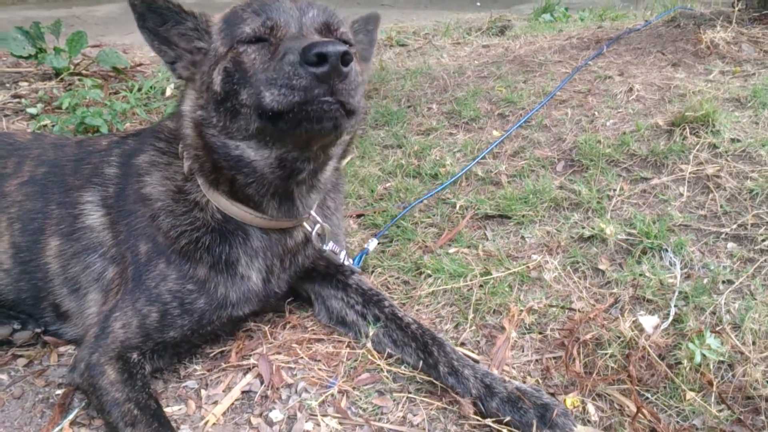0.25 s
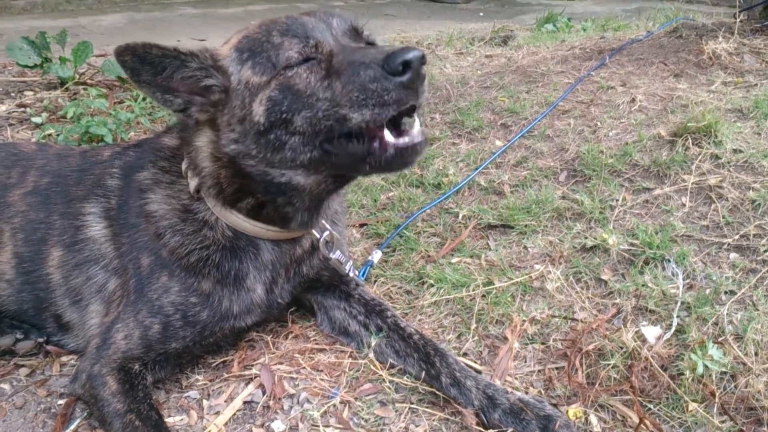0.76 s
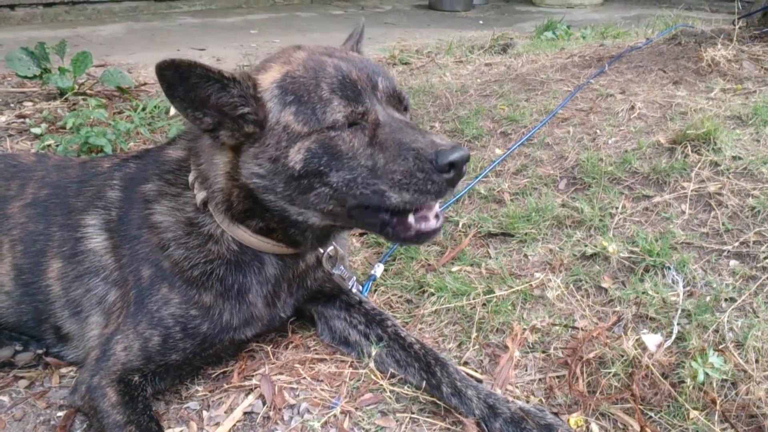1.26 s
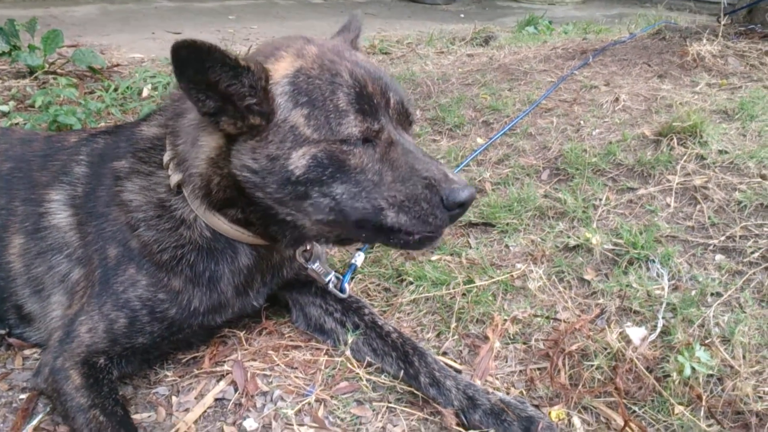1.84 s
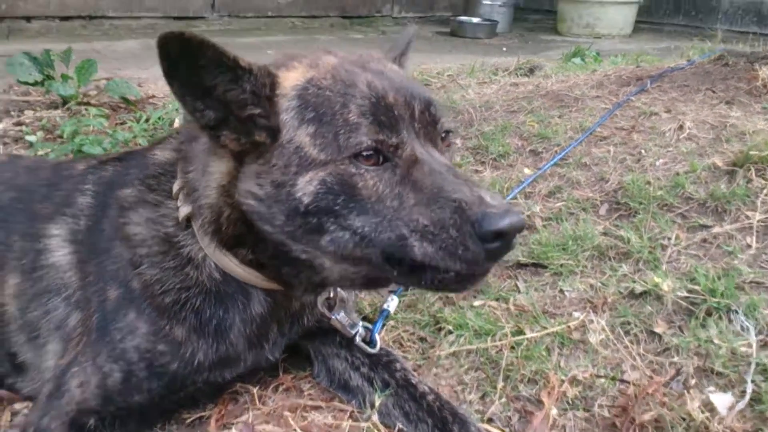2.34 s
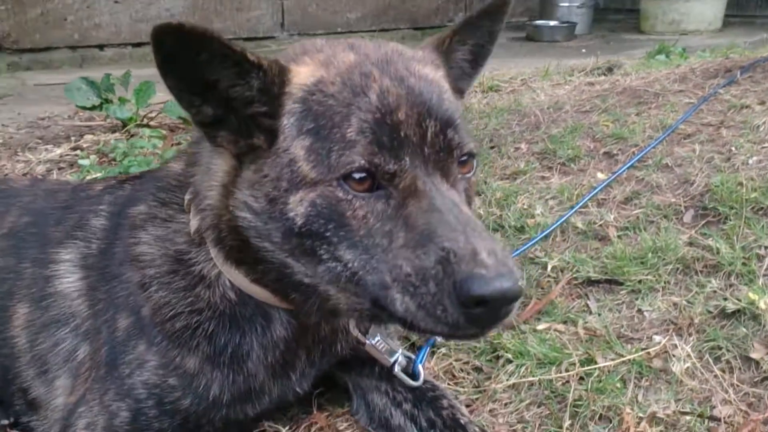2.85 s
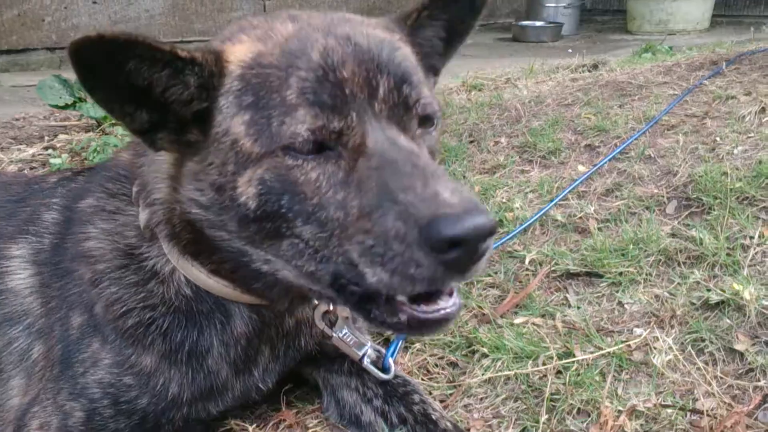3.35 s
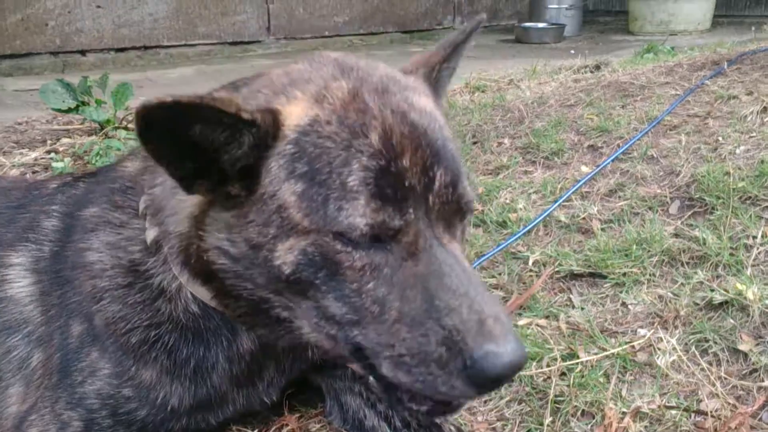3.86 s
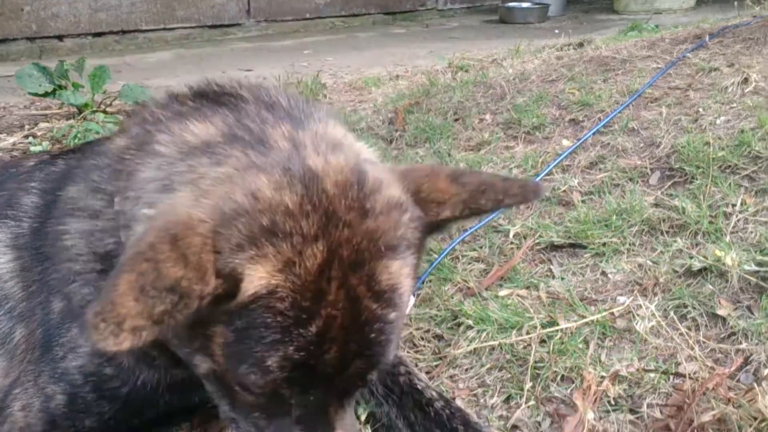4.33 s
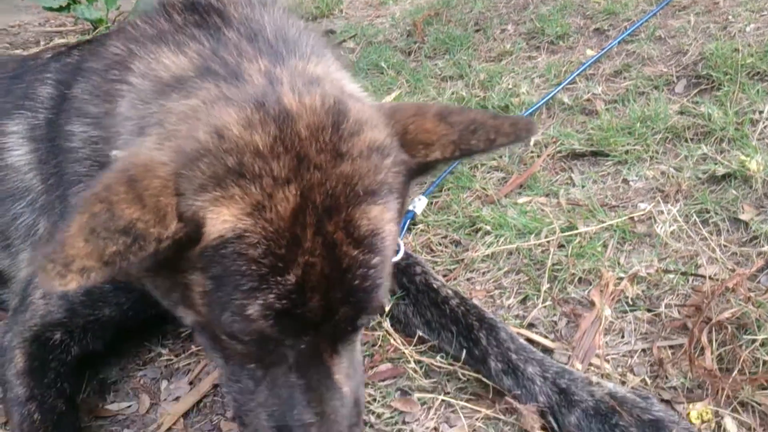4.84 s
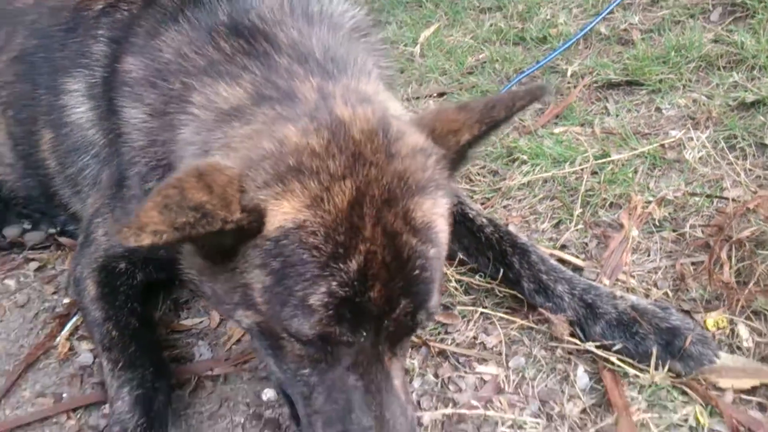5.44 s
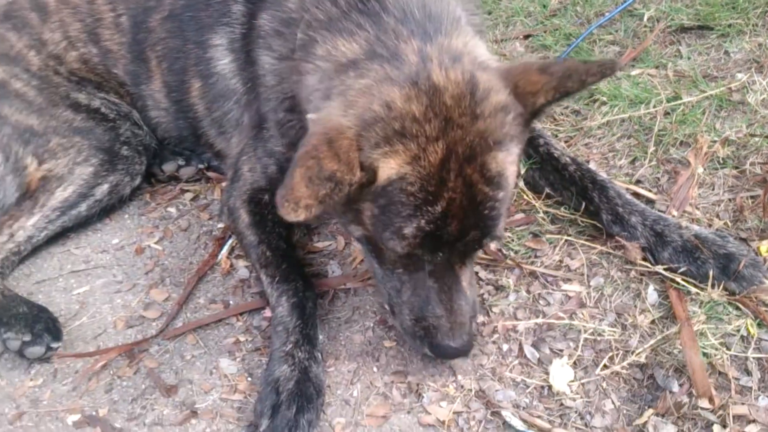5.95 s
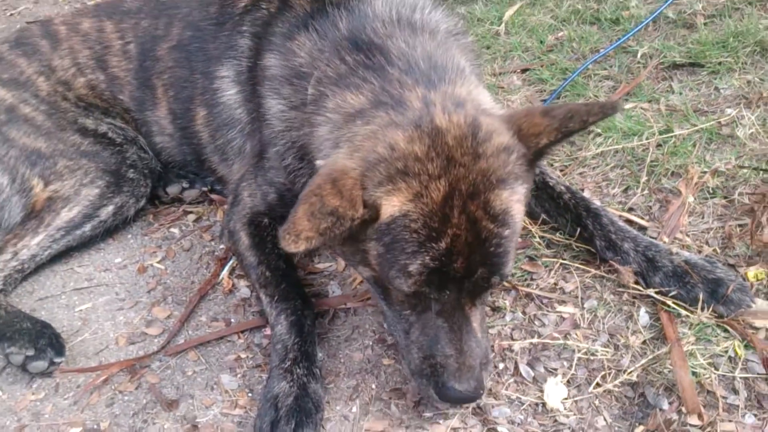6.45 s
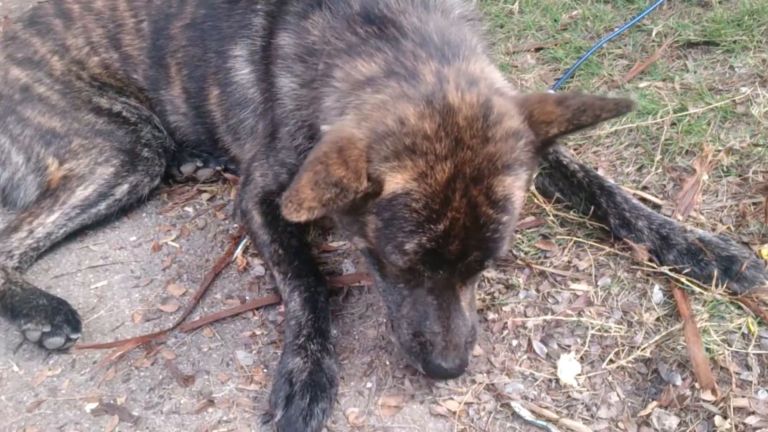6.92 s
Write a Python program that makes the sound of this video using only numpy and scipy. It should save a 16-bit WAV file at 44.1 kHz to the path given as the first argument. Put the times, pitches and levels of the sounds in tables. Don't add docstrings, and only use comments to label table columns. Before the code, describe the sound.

Faint outdoor background of airy hiss, steady low hum and light wind rumble, with high cicadas winding up and bursting roughly every second. Near the microphone, slightly left, a dog's mouth makes dry sharp tooth clicks, then soft sticky smacks, tiny straw ticks and collar clinks. Toward the end the snout bumps grit under a sustained, very high insect drone.

```python
import sys
import numpy as np
from scipy import signal
from scipy.io import wavfile
from scipy.ndimage import uniform_filter1d

SR = 44100
rng = np.random.default_rng(int(sys.argv[2]) if len(sys.argv) > 2 else 0)


def invert_db(level):
    return 10 ** (np.asarray(level, dtype=float) / 20)


def unload_audio(sound):
    columns = np.transpose(np.atleast_2d(sound))
    steps = np.round(np.clip(columns, -1, 1) * 32767)
    wavfile.write(sys.argv[1], SR, steps.astype(np.int16))


N = 317079


def evened(x):
    return x / np.sqrt(np.mean(x ** 2) + 1e-20)


def read(points, hz):
    f, value = np.transpose(points)
    return np.interp(np.log(hz + 1), np.log(f + 1), value)


def sides(x, pan_db, count=0):
    return np.array([x * invert_db(pan_db / 2), np.roll(x, count) * invert_db(-pan_db / 2)])


def add(mix, s, sound):
    part = mix[:, round(s * SR):][:, :sound.shape[1]]
    part += sound[:, :part.shape[1]]


def ring(hz, db, t60):
    t = np.arange(2600) / SR
    return invert_db(db - 60 * t / t60) * np.sin(2 * np.pi * hz * t)


def opened(pop, hz):
    cycles = np.arange(len(pop)) * hz / SR
    return pop * (1 - np.exp(-(cycles / .33) ** 2))


def crackle(t60):
    return np.diff(rng.standard_normal(601)) * invert_db(-60 * np.arange(600) / SR / t60)


def resonate(x, hz, width):
    turn = np.exp(2j * np.pi * np.cumsum(hz) / SR)
    r = np.exp(-np.pi * width / SR)
    smoothed = signal.lfilter([1], np.convolve([1, -r], [1, -r]), x / turn)
    return (turn * smoothed).real


def phrases(rows, rise_s, fade_db_per_s):
    start, held, db = np.transpose(rows)[:, :, None]
    t = np.arange(N) / SR - start
    shape = np.clip(t / rise_s, 0, 1) * invert_db(db - fade_db_per_s * np.maximum(t - held, 0))
    return np.sqrt((shape ** 2).sum(axis=0))


# f/Hz, left-right level/dB
FIELD_LEAN = [(60, -0.5), (200, 2), (1700, 1.5), (3000, 3.5), (4500, 0.5), (5300, -4), (7000, 4.5),
              (8500, 4.5), (10000, 0.5), (12500, -14.5), (14000, 1), (15500, -13)]
# f/Hz, likeness [1]
FIELD_COHERENCE = [(60, 0.77), (200, 0.5), (380, 0.67), (700, 0.84), (1290, 0.5), (2380, 0.24),
                   (4400, 0.032), (8000, 0.092), (15000, 0.23)]


def hiss(colour, patchy_db, size):
    hz = np.fft.rfftfreq(size, 1 / SR)
    a, b, c, d, patches = rng.standard_normal((N * 4 // size + 5, len(hz), 5)).T
    patches = uniform_filter1d(patches, size=3, axis=0)
    patches = evened(uniform_filter1d(patches, size=12000 // size, axis=1))
    same = np.clip(read(FIELD_COHERENCE, hz), -1, 1)[:, None]
    left = a + 1j * b
    right = same * left + np.sqrt(1 - same ** 2) * (c + 1j * d)
    z = np.array([left, right])
    z[1] *= np.exp(-2j * np.pi * hz * 0.0002683)[:, None]
    z *= invert_db(read(colour, hz)[:, None] + patchy_db * patches)
    z *= invert_db(np.outer([.5, -.5], read(FIELD_LEAN, hz)))[:, :, None]
    return evened(signal.istft(z, nperseg=size, noverlap=size * 3 // 4)[1][:, :N])


# t/s, half length/s, level over the calm/dB
GUSTS = [
    (.47, 0.21, 6.5),
    (2.1, 0.65, 6.5),
    (3.5, 0.22, 3),
    (5.406, 0.39, 8.5),
    (6.35, 0.43, 5.5),
]
# f/Hz, density level/dB
WIND_COLOUR = [(15, -26), (25, -17), (32, -20), (40, -2.5), (48, 1), (65, -7), (100, 2), (125, -29),
               (160, -32), (300, -90)]


def breeze():
    t = np.arange(N) / SR
    gusts_db = sum(db * np.exp(-((t - s) / half) ** 2) for s, half, db in GUSTS)
    return invert_db(-69.5 + gusts_db) * hiss(WIND_COLOUR, 0.29, size=4096)


# f/Hz, density level/dB
AIR_COLOUR = [(65, -62), (110, -1.5), (150, -4.5), (193, -7), (275, -7.5), (368, -17), (1070, -28.5),
              (2610, -28.5), (3220, -26.5), (5410, -10.5), (7400, -15), (9500, -26.5), (12500, -20),
              (14400, -20), (16000, -34)]


def open_air():
    return invert_db(-53) * hiss(AIR_COLOUR, 2.47, size=2048)


MOTOR_HZ = 143.5
# t/s, level/dB
MOTOR_LEVEL = [(0, -55), (1.3, -54.5), (2.3, -55.5), (3.3, -58.5), (4.2, -58.5), (5.5, -55.5), (7.19, -56)]
# multiple [1], level re hum/dB, width/Hz
MOTOR_OVERTONES = [(1.854, -17.5, 10.3), (1.999, -14.5, 9.6), (2.998, -23, 9.1)]


def motor():
    t = np.arange(N) / SR
    hum = np.sqrt(2) * np.sin(2 * np.pi * MOTOR_HZ * t)
    for multiple, db, width in MOTOR_OVERTONES:
        line_hz = np.full(N, multiple * MOTOR_HZ)
        hum = hum + invert_db(db) * evened(resonate(rng.standard_normal(N), line_hz, width))
    level_db = np.interp(t, *np.transpose(MOTOR_LEVEL))
    return sides(invert_db(level_db) * hum, 2.6, count=11)


# f/Hz, density level/dB
CHORUS_SPECTRUM = [(1050, -13), (1500, -9), (2000, -5), (2630, -4), (3120, -5.5), (3890, -2.5),
                   (4700, -0.5), (5320, -0.5), (6720, -5), (9500, -14.5), (12400, -30), (20900, -120)]
# end t/s, length/s, level/dB, lowest band f/Hz, chorus swell/dB
WIND_UPS = [(0.98, 0.13, -47.5, 1950, 1), (2.087, 0.15, -47.5, 1790, 2), (3.204, 0.16, -47.5, 1740, 0),
            (4.314, 0.098, -45.5, 1970, 1), (5.363, 0.2, -47.5, 2500, 2), (6.453, 0.26, -49, 1980, 2)]


def chorus():
    t = np.arange(N) / SR
    swell_db = sum(np.interp(t - end, [-0.45, 0, 0.42], [0, db, 0]) for end, *_, db in WIND_UPS)
    return invert_db(-51.5 - 0.13 * t + swell_db) * hiss(CHORUS_SPECTRUM, 3.0, size=512)


# start t/s, length/s, first f/Hz, last f/Hz, level/dB
STRAY_NOTES = [(0.042, 0.16, 1640, 2240, -60), (0.33, 0.31, 1900, 2160, -60),
               (0.22, 0.57, 4940, 5100, -53.5), (0.73, 0.18, 1800, 2200, -64),
               (1.147, 0.36, 2010, 2100, -62), (4.4, 0.1, 4100, 4100, -51.5), (1.66, .18, 8000, 8500, -65),
               (1.342, 0.075, 4500, 4400, -50), (1.418, 0.25, 1440, 1900, -65),
               (2.137, 0.16, 2200, 2340, -57), (2.545, 0.22, 1400, 2440, -60),
               (3.185, 0.044, 2400, 2940, -53.5), (4.854, 0.29, 2100, 3100, -62),
               (5.084, 0.12, 1400, 1600, -65), (6.5, 0.26, 3840, 4400, -56.5),
               (6.2, 0.11, 2600, 3400, -57.5)]
# start t/s, length/s, first f/Hz, last f/Hz, level/dB
THIN_WHISTLES = [(.78, 0.16, 3800, 4240, -54), (.996, 0.066, 4180, 4100, -55),
                 (2.275, 0.045, 4030, 4100, -58), (2.3, 0.15, 5500, 5380, -56),
                 (3.11, .11, 7000, 5100, -57), (3.09, .07, 3350, 3700, -57), (3.12, .07, 1730, 2620, -59),
                 (6.33, 0.11, 5350, 5350, -53), (6.2, .1, 5300, 5400, -57), (3.27, 0.098, 4100, 4250, -54),
                 (3.365, 0.079, 4230, 4280, -57), (4.51, 0.11, 3780, 3700, -58),
                 (4.605, 0.14, 3780, 3900, -55), (4.72, 0.2, 4300, 3600, -65), (4.41, .09, 3850, 3800, -55),
                 (3.155, 0.05, 5250, 5400, -49.5), (5.4, 0.3, 4040, 3890, -54.5),
                 (6.33, 0.16, 4260, 4070, -57)]
# start t/s, length/s, level/dB
RASP_CALLS = [(0.22, 0.14, -55.5), (1.284, 0.17, -54), (2.237, 0.11, -55), (3.234, 0.11, -51.5),
              (5.232, 0.14, -55), (6.247, 0.15, -50)]
# first f/Hz, last f/Hz, level/dB, width/Hz, share of the length [1]
UPPER_BANDS = [
    (3850, 4280, -7.5, 720, .65),
    (5400, 5710, -4.5, 1040, 1.15),
]


def song():
    rows = [(*note, 490) for note in STRAY_NOTES]
    rows += [(*note, 120) for note in THIN_WHISTLES]
    rasp_hz = 7120
    rows += [(start, length, rasp_hz, 1.06 * rasp_hz, db, 2100) for start, length, db in RASP_CALLS]
    for end, length, db, low_hz, _ in WIND_UPS:
        rows.append((end - length, length, low_hz, 1.43 * low_hz, db - 10.5, 660))
        for first_hz, last_hz, relative_db, width, share in UPPER_BANDS:
            span = share * length
            rows.append((end - span, span, first_hz, last_hz, db + relative_db, width))
    return rows


def notes():
    out = np.zeros((2, N))
    for start, length, first_hz, last_hz, db, width in song():
        count = round(length * SR)
        glide_hz = np.linspace(first_hz, last_hz, count)
        band = evened(resonate(rng.standard_normal((2, count)), glide_hz, 1.4 * width))
        throb_hz = glide_hz / glide_hz[0] * rng.uniform(144.0, 203.0)
        throb = 1 + 0.13 * np.cos(2 * np.pi * np.cumsum(throb_hz) / SR)
        flicker = evened(uniform_filter1d(rng.standard_normal(SR // 2 + 4000), size=900))[:count]
        crescendo_db = np.linspace(-2, 2, count)
        loudness = invert_db(db + crescendo_db + 2 * flicker)
        add(out, start, loudness * band * throb * signal.windows.tukey(count, .6))
    return out


def buzz(loudness, pan_db, colour, clicks_hz, depth):
    rate = clicks_hz * (1 + 0.111 * evened(uniform_filter1d(rng.standard_normal(N), size=4000)))
    throb = 1 + depth * np.cos(2 * np.pi * np.cumsum(rate) / SR)
    lean = invert_db(np.outer([.5, -.5], pan_db + 5.5))
    return invert_db(2.0) * loudness * throb * lean * hiss(colour, 1.1, size=512)


# start t/s, held/s, level/dB
NEAR_BURSTS = [(.93, 0.16, -47.5), (2.065, 0.16, -47.5), (3.195, .16, -46.5), (4.305, 0.15, -46.5),
               (5.345, 0.17, -46.5), (6.44, 0.14, -46.5)]
# start t/s, held/s, level/dB
WEAKER_BURSTS = [(0, 0.017, -60), (.1, .2, -67), (.57, 0.23, -57), (1.42, 0.13, -57),
                 (1.67, 0.17, -57.5), (2.35, 0.096, -52), (2.73, .3, -55.5), (3.1, 1.7, -58)]
# f/Hz, density level/dB
BURST_SPECTRUM = [(4710, -71), (8000, -2.5), (8970, -5), (10300, 3), (11200, -4), (12200, 3), (13900, 7.5),
                  (15350, 3), (15800, -3)]


def cicada_bursts():
    loudness = phrases(NEAR_BURSTS + WEAKER_BURSTS, rise_s=0.0072, fade_db_per_s=134)
    return buzz(loudness, -3.5, BURST_SPECTRUM, 190, 0.12)


DRONE_RISE_S, DRONE_FADE_DB_PER_S = 0.032, 35
# start t/s, held/s, level/dB
DRONE_BREATHS = [
    (4.63, 1.22, -49),
    (6.03, 0.95, -50.5),
]
# f/Hz, density level/dB
DRONE_SPECTRUM = [(5000, -64), (8500, -3), (8930, -6.5), (10400, 2), (11400, -3), (12300, 4), (12700, 7.5),
                  (15350, 4), (15800, -18)]


def cicada_drone():
    loudness = phrases(DRONE_BREATHS, DRONE_RISE_S, DRONE_FADE_DB_PER_S)
    return buzz(loudness, -4.5, DRONE_SPECTRUM, 83, 0.11)


# f/Hz, level/dB
DRUM_MODES = [(12460, -67), (12694, -65), (13130, -68), (13380, -66), (13700, -69), (13916, -65)]
# start t/s, held/s, level/dB
DRUM_SPELL = [
    (5.65, 1.4, 2.5),
]


def drum():
    noise = rng.standard_normal((2, N))
    bands = np.zeros((2, N))
    for hz, db in DRUM_MODES:
        b, a = signal.iirpeak(hz, hz / 200, SR)
        bands += invert_db(db) * evened(signal.lfilter(b, a, noise))
    return phrases(DRUM_SPELL, DRONE_RISE_S, DRONE_FADE_DB_PER_S) * invert_db([[-4], [4]]) * bands


def ticks(rows, t60):
    out = np.zeros((2, N))
    for s, db, low_hz, high_hz, pan_db in rows:
        rings = ring(low_hz, 0.28, t60) + ring(high_hz, -12, t60)
        click = rings[:600] + invert_db(-15) * crackle(t60)
        add(out, s, invert_db(db + 2) * sides(click, pan_db, count=9))
    return out


STRAW_T60_S = .005
# t/s, peak level/dB, low f/Hz, high f/Hz, left-
# right level/dB
STRAW_TICKS = [(2.389, -36, 6000, 10500, 3), (2.3918, -41, 6500, 10000, 1), (2.3943, -40, 8600, 12000, -4),
               (1.6401, -32.5, 5650, 5250, 15), (6.0006, -43, 9100, 10500, -9),
               (6.8945, -44, 7800, 5900, 2), (6.0005, -39, 7300, 6300, -9), (2.742, -33.5, 6400, 7500, -10),
               (2.7416, -38, 9600, 11200, -10), (2.7418, -38, 11000, 14500, -10),
               (6.9222, -45, 2300, 1100, 6), (6.9845, -42, 2300, 5900, 6), (6.984, -46, 6600, 5400, 3),
               (.946, -46, 9300, 5400, 11), (2.0148, -42, 8100, 6900, 11), (2.0146, -44, 2500, 2900, 11)]


def straw():
    return ticks(STRAW_TICKS, STRAW_T60_S)


# t/s, peak level/dB, low f/Hz, high f/Hz, left-right level/dB
STEM_BREAKS = [
    (2.742, -33.5, 6400, 7500, -10),
    (2.7416, -37, 9600, 11200, -10),
    (2.7418, -39, 11000, 14500, -10),
    (2.7417, -46, 15900, 13000, -6),
]


def stem():
    return ticks(STEM_BREAKS, STRAW_T60_S)


# t/s, peak level/dB, low f/Hz, high f/Hz, left-right level/dB
CLIP_CLINKS = [(.8553, -38, 4820, 3850, 11), (4.2805, -48, 5170, 4000, -5), (5.676, -40, 2600, 3800, 5.5),
               (.9461, -36.5, 7450, 5300, 11), (.9461, -42, 5350, 7600, 11), (.9488, -42, 5100, 7500, 11),
               (2.0195, -45, 3950, 4100, 11), (6.0014, -43, 5400, 6200, -12)]


def collar_clip():
    return ticks(CLIP_CLINKS, .013)


# start t/s, end t/s, f/Hz, width/Hz, level/dB
WET_RUSTLES = [(.82, 0.864, 1000, 700, -71), (3.88, 3.964, 1410, 500, -61.5),
               (4.799, 4.89, 950, 400, -61.5), (5.18, 5.25, 865, 500, -63), (5.45, 5.593, 1300, 700, -64),
               (5.664, 5.692, 600, 500, -60), (6.898, 6.94, 1800, 1600, -66),
               (6.97, 6.991, 2420, 1400, -62)]


def rustles():
    out = np.zeros((2, N))
    for start, end, hz, width, db in WET_RUSTLES:
        chance, strength = rng.random((2, round((end - start) * SR)))
        bursts = (chance < 1100 / SR) * (strength - .5)
        wet = evened(resonate(bursts + 1e-9, np.full(len(bursts), hz), width))
        add(out, start, sides(invert_db(db) * wet * np.hanning(len(wet)), 7.9, count=8))
    return out


# t/s, peak level/dB, cavity f/Hz, t60/s, left-right level/dB
LIP_SMACKS = [(0.823, -47, 926, 0.011, 6), (0.855, -55.5, 1350, 0.015, 11), (1.55, -46, 1630, 0.018, 4),
              (2.152, -55, 840, 0.016, 18), (2.311, -54.5, 860, 0.012, 21), (2.354, -47, 1372, 0.0085, 7),
              (2.59, -46, 1270, 0.01, 8), (2.631, -52, 1610, 0.017, 10), (3.024, -61, 1500, 0.018, -19),
              (3.049, -42, 1410, 0.011, 7), (3.181, -52.5, 1470, 0.024, 8), (3.444, -41.5, 1210, 0.0096, 4),
              (3.625, -52.5, 1280, 0.021, 7), (3.799, -40.5, 1280, 0.0073, 6), (3.954, -50, 1640, 0.017, 3),
              (4.714, -49, 1550, 0.014, 4.5), (4.829, -54, 960, 0.013, 7), (4.849, -56, 900, 0.014, 10),
              (5.209, -56, 716, 0.013, 2.0), (5.461, -52, 1430, 0.023, 5.0), (5.519, -55, 1380, 0.012, 5.0),
              (5.559, -49, 1410, 0.012, 12), (6.922, -50, 1540, 0.014, 8), (6.989, -67, 799, 0.014, 2.0)]
# t/s, peak level/dB, f/Hz,
# t60/s, left-right level/dB
SNOUT_GRIT = [(6.1958, -40, 1560, .02, 6), (4.263, -45, 3800, .02, 2), (4.84, -54, 900, .015, 5),
              (6.1785, -50, 750, .03, 5), (6.179, -40, 240, .02, 3), (5.6694, -40, 480, .009, 6),
              (5.6716, -43, 900, .006, 6), (5.6731, -37, 1050, .007, 6), (5.675, -37, 620, .009, 6),
              (5.6868, -44, 800, .01, 6), (4.2785, -43, 2550, .03, 14), (5.6805, -28.5, 430, .007, 6),
              (6.1924, -30, 1480, .009, 6), (6.1924, -37, 1050, .008, 6), (6.1926, -39.5, 2150, .007, 6),
              (6.1935, -43, 3000, .008, 6), (.8575, -42, 3950, .014, 9), (5.6765, -42, 330, .015, 6),
              (6.192, -49, 380, .015, 4), (6.203, -47, 250, .03, 2), (1.8225, -42, 300, .025, 8),
              (2.254, -44, 270, .025, 8), (5.6832, -42, 330, .02, 6)]


def smacks():
    out = np.zeros((2, N))
    for s, db, hz, t60, pan_db in LIP_SMACKS + SNOUT_GRIT:
        pop = ring(hz, db + 3, t60) + ring(2.1 * hz, db - 9, .8 * t60)
        pop = opened(pop, hz)
        bounce = 0.2 * np.roll(pop, 165) - 0.21 * np.roll(pop, 225) + 0.14 * np.roll(pop, 400)
        add(out, s, sides(pop + bounce, pan_db, count=8))
    return out


# t/s, peak level/dB, mouth cavity f/Hz, cavity level/dB, left-right level/dB
TOOTH_SNAPS = [
    (1.6374, -24, 784, -41, 12),
    (1.8211, -19.5, 920, -48, 16),
    (2.2529, -25.5, 912, -40, 13.5),
]
# t/s, peak level/dB, mouth cavity f/Hz, cavity level/dB, left-right level/dB
TOOTH_NIPS = [
    (2.0143, -37, 870, -48, 11),
]
# f/Hz, level/dB, t60/s
ENAMEL_MODES = [(7100, -7.5, 0.0026), (8500, -13, 0.0033), (13400, -27, .003), (3140, -11.5, 0.0052)]
# f/Hz, level/dB, t60/s
JAW_MODES = [(95, -33, .04), (2400, -20, .008), (3150, -23, .006), (8800, -14, .005), (6300, -17, .004),
             (4250, -21, .008), (1600, -20, .018)]


def snaps(rows):
    out = np.zeros((2, N))
    enamel = sum(ring(*mode) for mode in ENAMEL_MODES)
    jaw = sum(ring(*mode) for mode in JAW_MODES)
    skull_swell = np.hanning(round(.011 * SR))
    for s, db, mouth_hz, mouth_db, pan_db in rows:
        slip_ms = 1.85 - .022 * db
        t = np.arange(0, slip_ms / 1000, 1 / SR)
        squeak_hz = 5340 * (1 + 0.71 * np.exp(-t / 0.00022))
        squeak = np.sin(2 * np.pi * np.cumsum(squeak_hz) / SR)
        squeak = squeak * signal.windows.tukey(len(t), .55) * invert_db(-14 * (t / t[-1] - .4) ** 2)
        fracture = np.convolve(crackle(.012), np.hanning(7))[:600]
        fracture = fracture * np.minimum(np.arange(600) / 15., 1)
        skull = skull_swell * ring(4000, db - 20, .1)[:len(skull_swell)]
        mouth = ring(mouth_hz, mouth_db + 8.5, 0.015) + ring(0.78 * mouth_hz, mouth_db - 0.5, 0.018)
        mouth = invert_db(2.0) * opened(mouth, mouth_hz)
        add(out, s, invert_db(db + 3.5) * sides(squeak, pan_db, count=4))
        add(out, s, invert_db(db - 14) * sides(fracture, .8 * pan_db, count=4))
        add(out, s, invert_db(db + 4) * sides(enamel, .7 * pan_db, count=4))
        add(out, s + .0014, invert_db(db + 4) * sides(jaw, .9 * pan_db, count=11))
        add(out, s + .001, sides(skull, 1.2 * pan_db, count=11))
        add(out, s + .0007, sides(mouth, 0.95 * pan_db, count=22))
    return out


# f/Hz, level re neighbours/dB
GATE_DIP = [(1800, -9), (2300, -3.4), (3600, -3), (4600, -4), (7500, -4.5), (8800, -2.8), (11000, -3),
            (12000, -5), (14300, -4.5), (15100, -2.6)]


def gated(x):
    hz, _, z = signal.stft(x, SR, nperseg=1024, noverlap=768)
    power = uniform_filter1d((abs(z) ** 2).sum(axis=0), size=7, axis=1)
    level_db = 10 * np.log10(abs(uniform_filter1d(power, size=2, axis=0)) + 1e-20)
    dip_db = level_db - uniform_filter1d(level_db, size=25, axis=0) - read(GATE_DIP, hz)[:, None]
    gain = invert_db(np.clip(7 * dip_db, -24, 0))
    return signal.istft(z * gain, SR, nperseg=1024, noverlap=768)[1][:, :N]


def low_passed(x, edge_hz):
    taps = signal.firwin(1023, edge_hz, window=("kaiser", 9), fs=SR)
    return signal.oaconvolve(x, taps[None], "same")


def scene():
    background = breeze() + open_air() + motor()
    cicadas = chorus() + notes() + cicada_bursts() + cicada_drone() + drum()
    dog = straw() + collar_clip() + rustles() + smacks() + snaps(TOOTH_NIPS)
    faint = background + cicadas + dog
    return low_passed(gated(faint), 15530) + stem() + snaps(TOOTH_SNAPS)


def band_limit(x):
    return signal.sosfilt(signal.butter(12, 16670, fs=SR, output="sos"), x)


def record(dry):
    mix = low_passed(dry, 16600)
    return band_limit(mix)


dry = scene()
out = record(dry)
unload_audio(out)
```